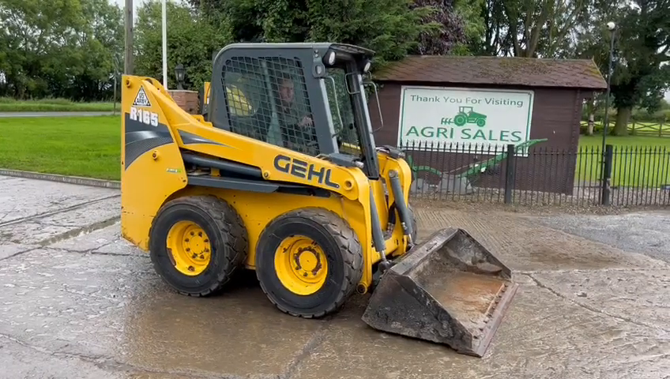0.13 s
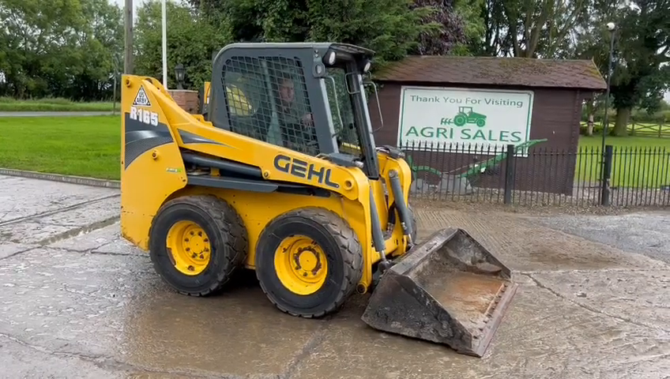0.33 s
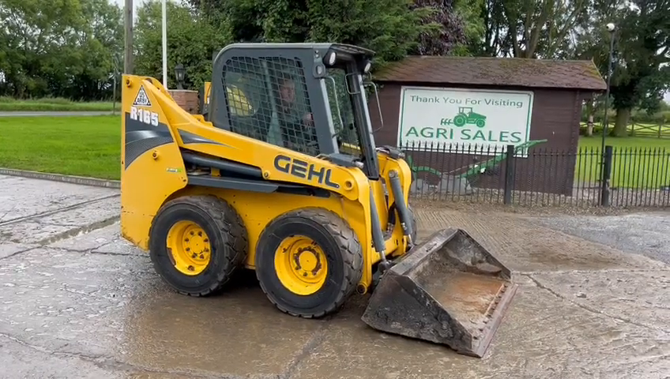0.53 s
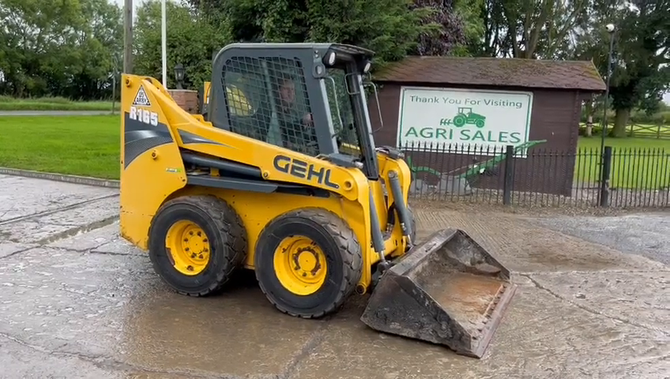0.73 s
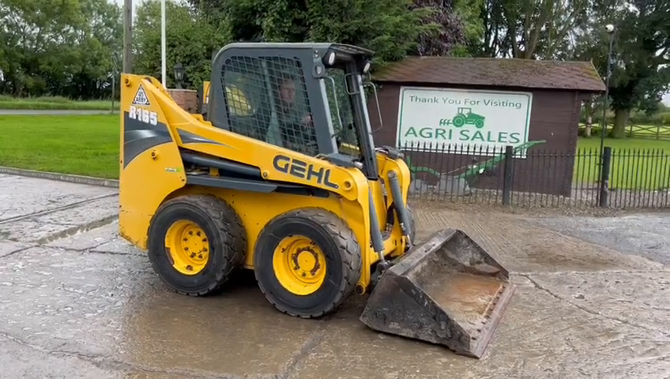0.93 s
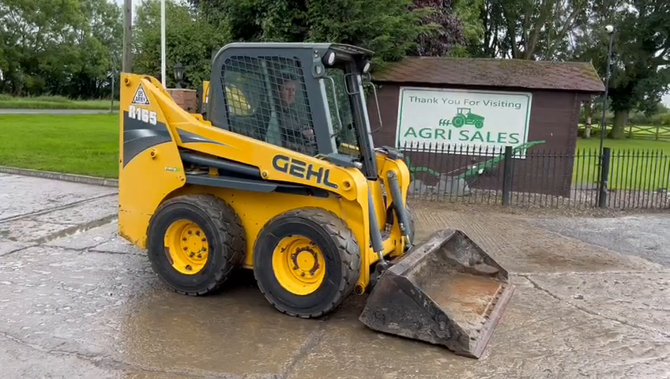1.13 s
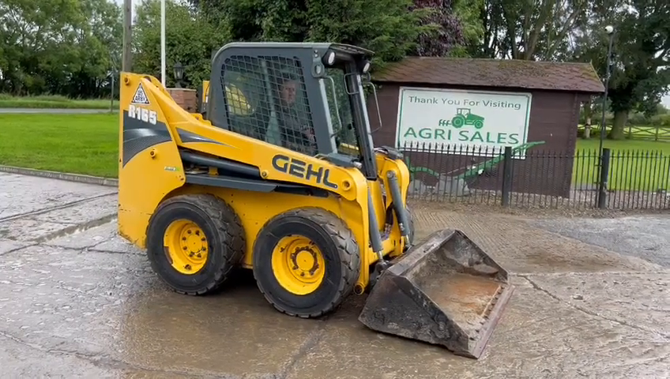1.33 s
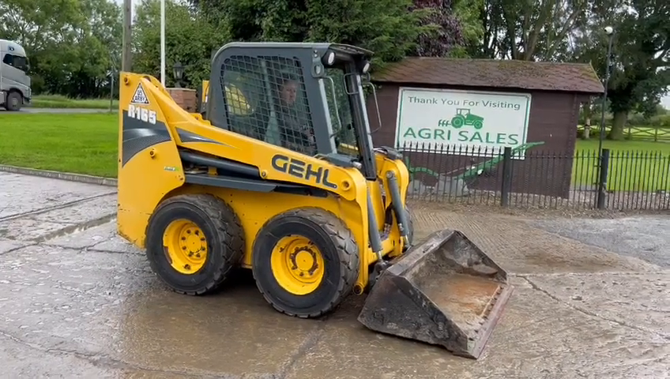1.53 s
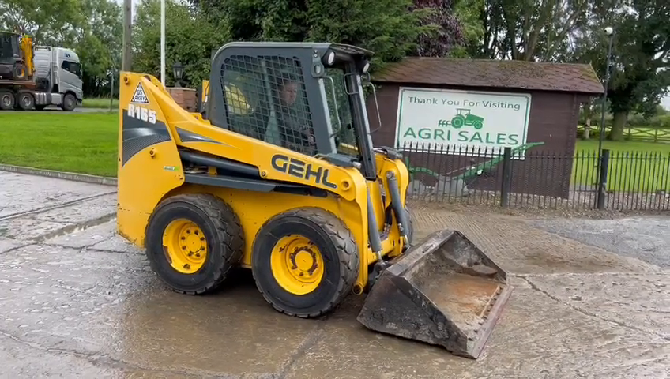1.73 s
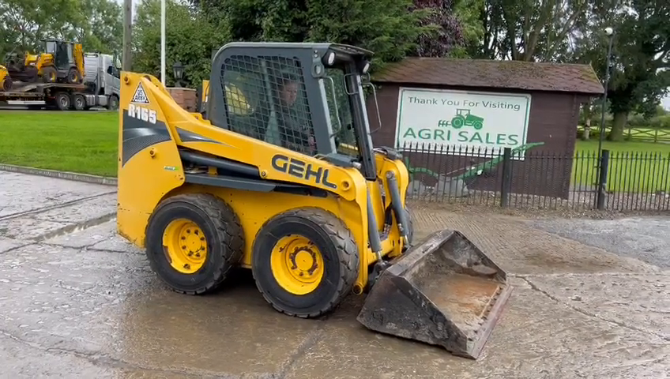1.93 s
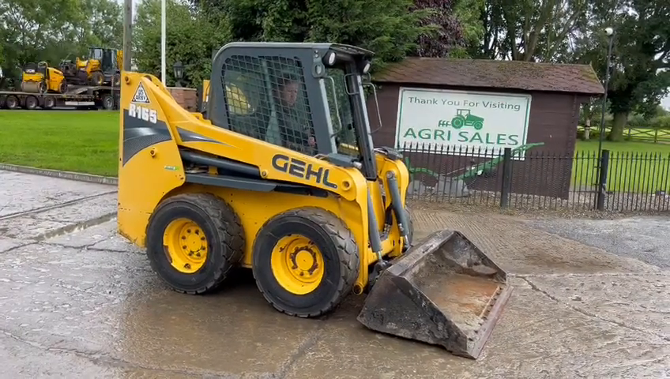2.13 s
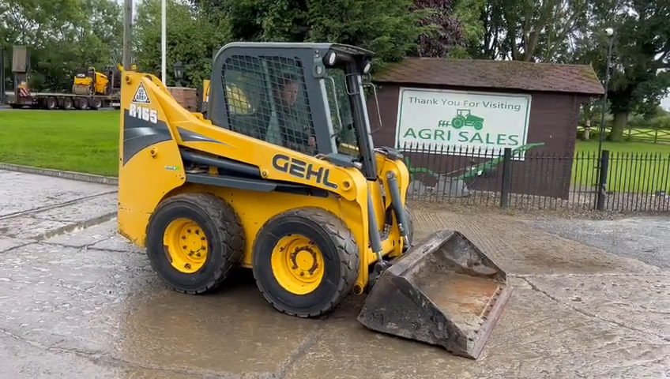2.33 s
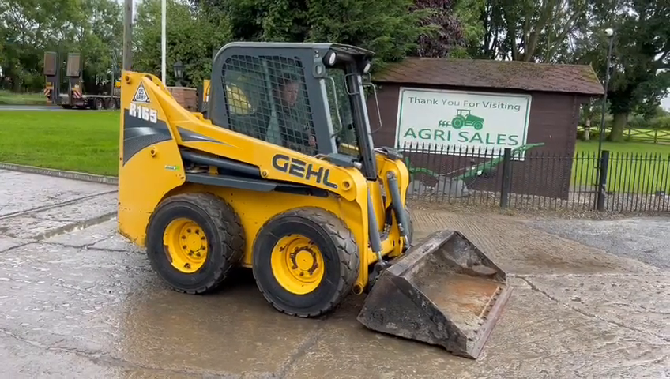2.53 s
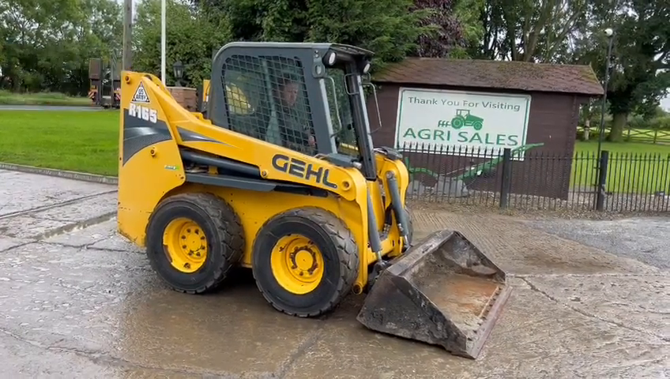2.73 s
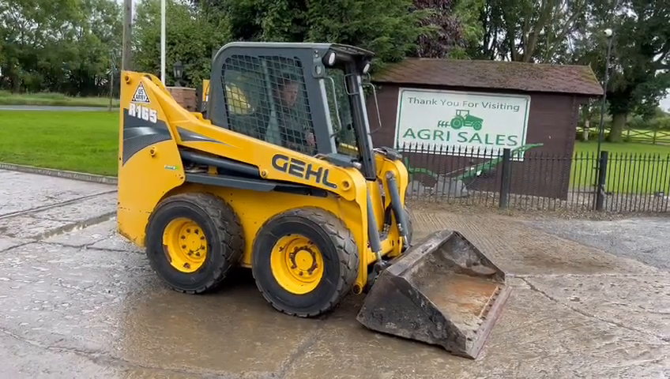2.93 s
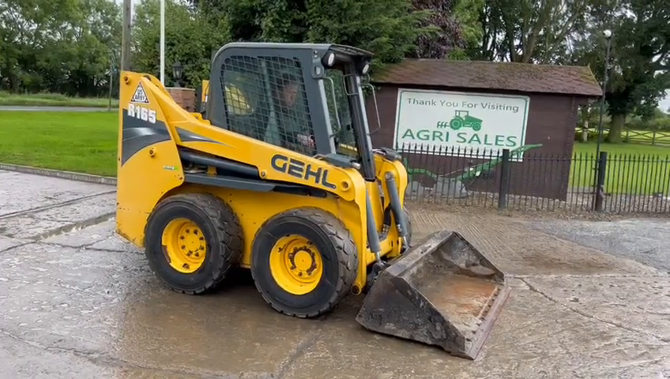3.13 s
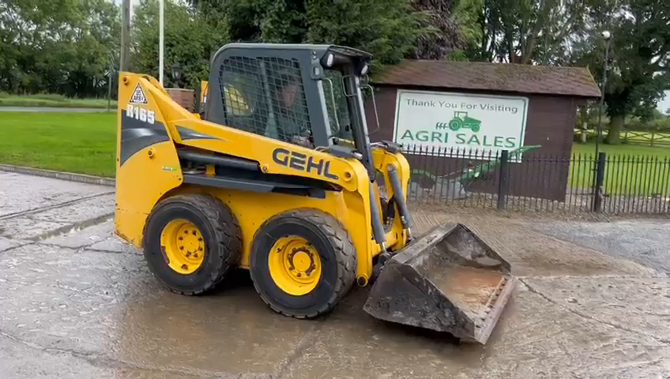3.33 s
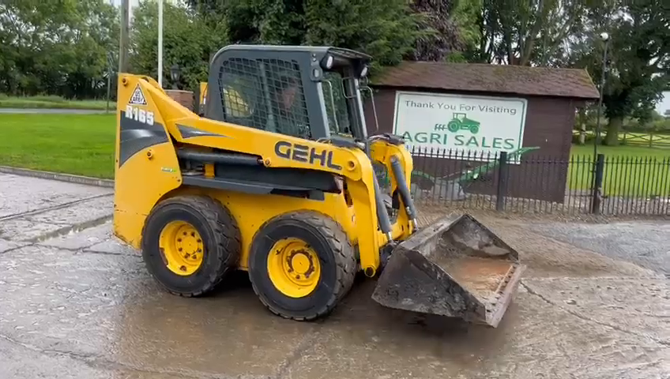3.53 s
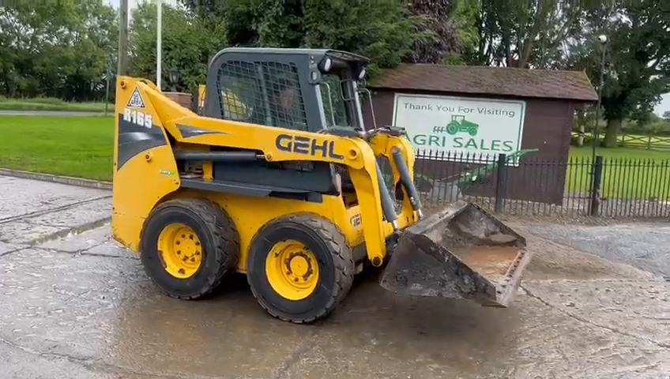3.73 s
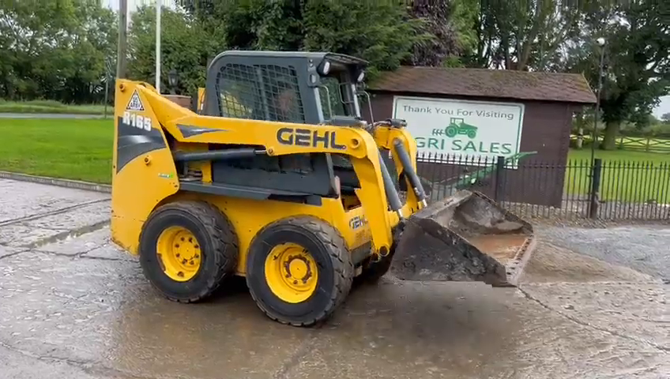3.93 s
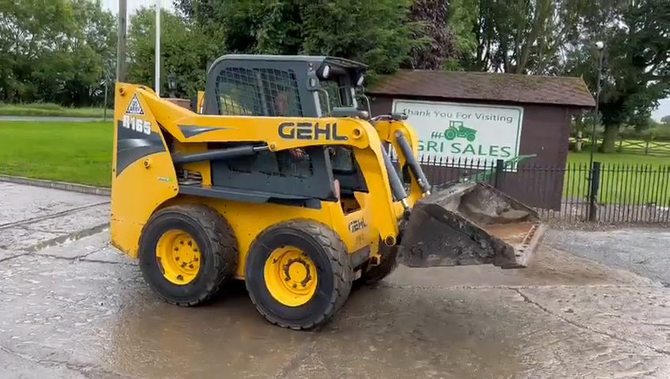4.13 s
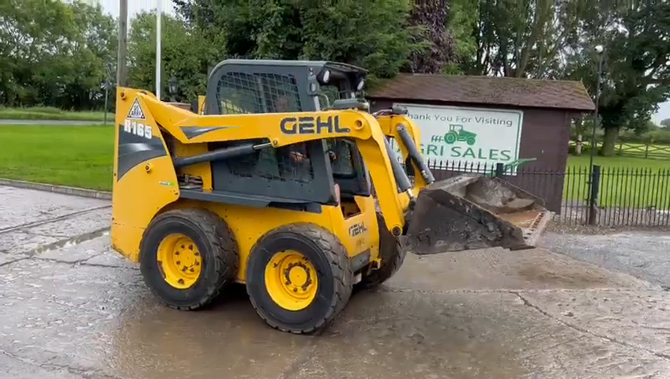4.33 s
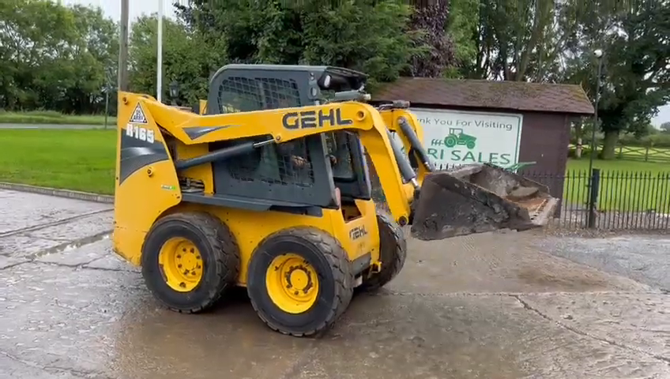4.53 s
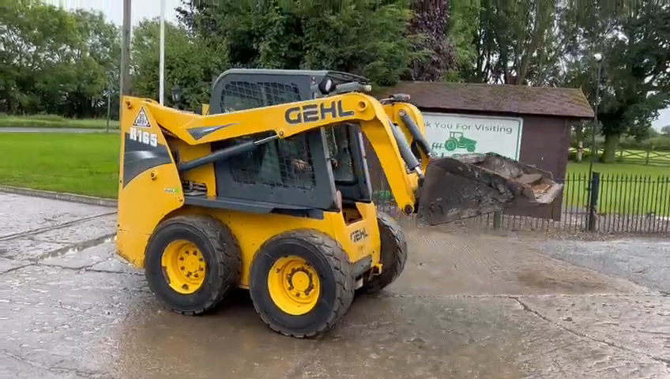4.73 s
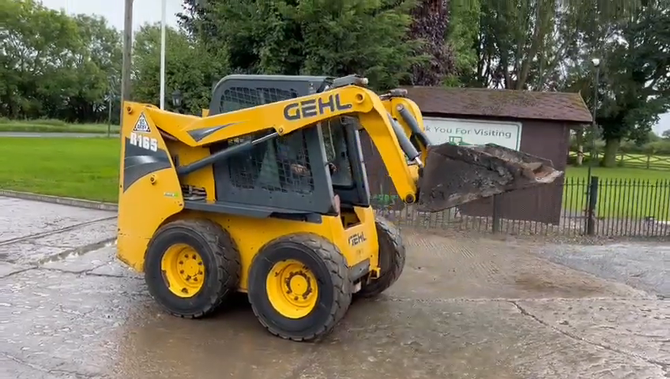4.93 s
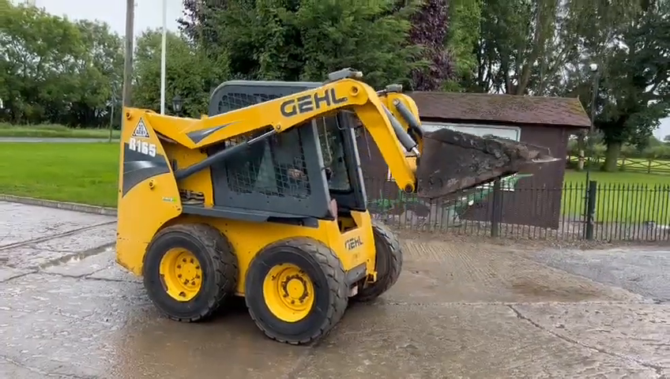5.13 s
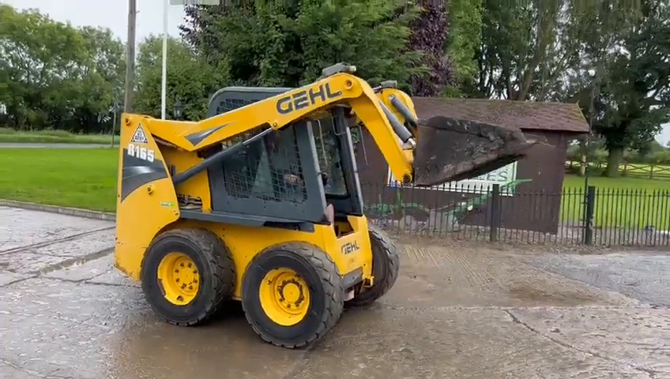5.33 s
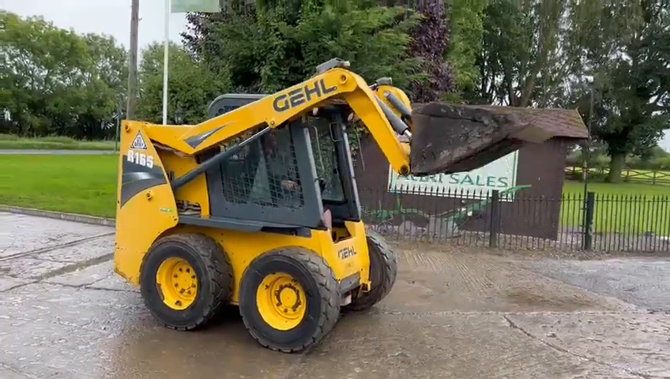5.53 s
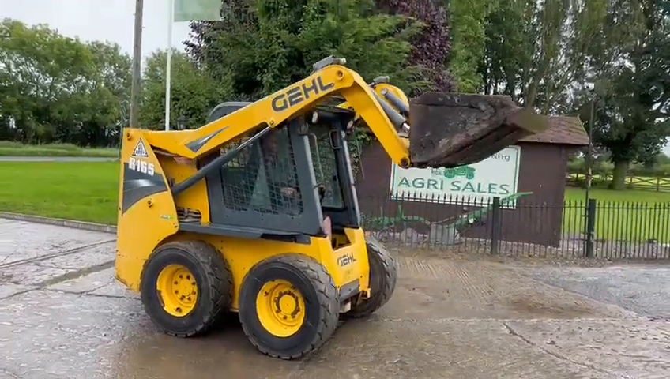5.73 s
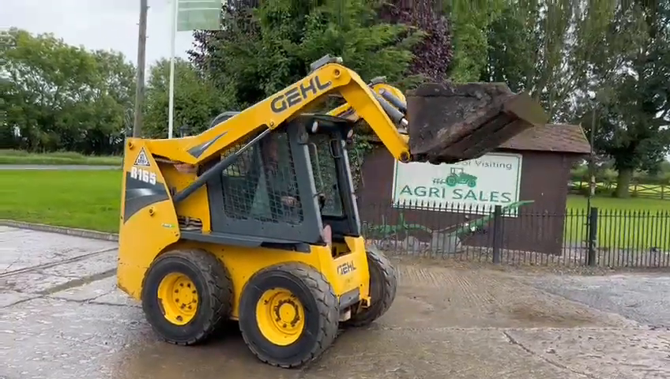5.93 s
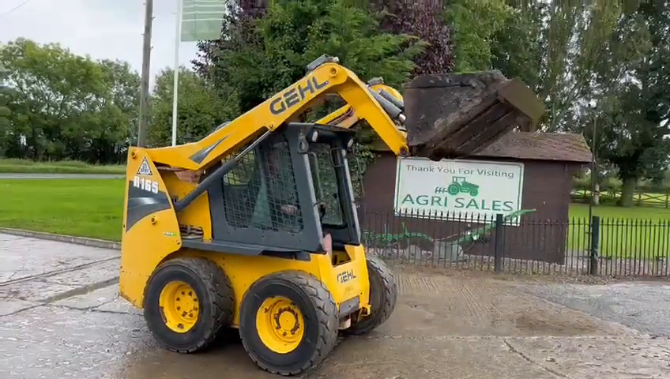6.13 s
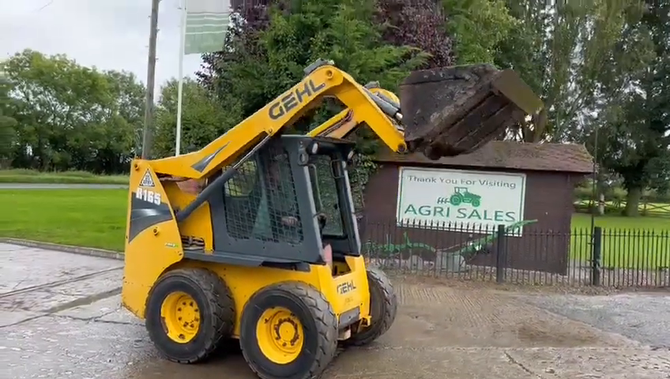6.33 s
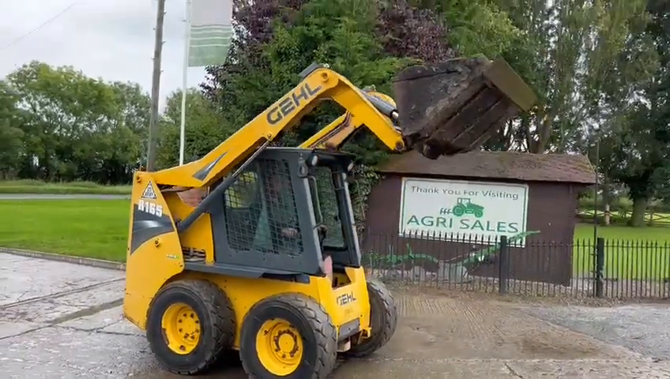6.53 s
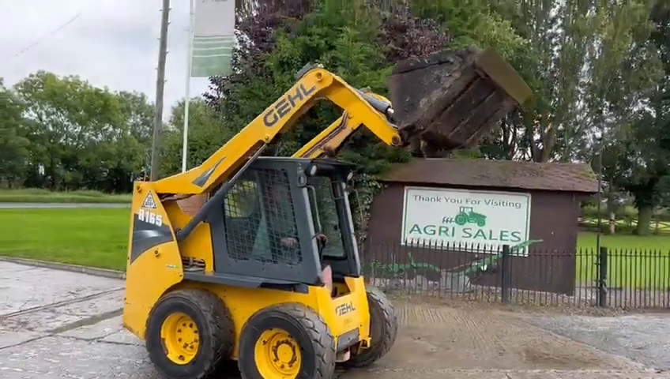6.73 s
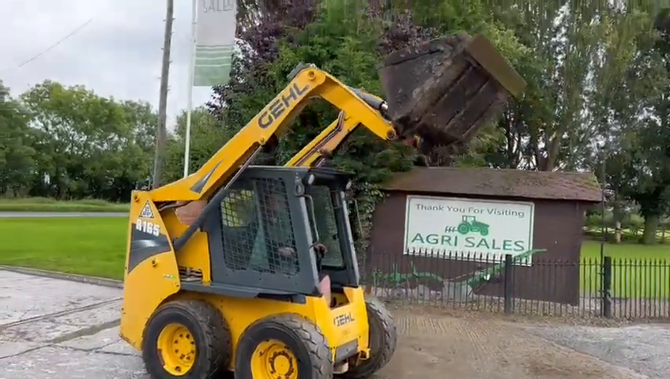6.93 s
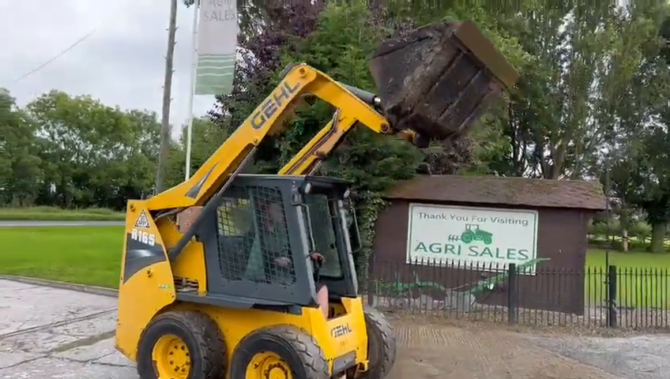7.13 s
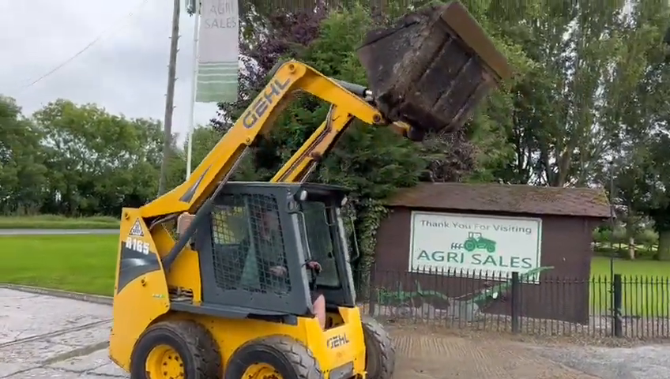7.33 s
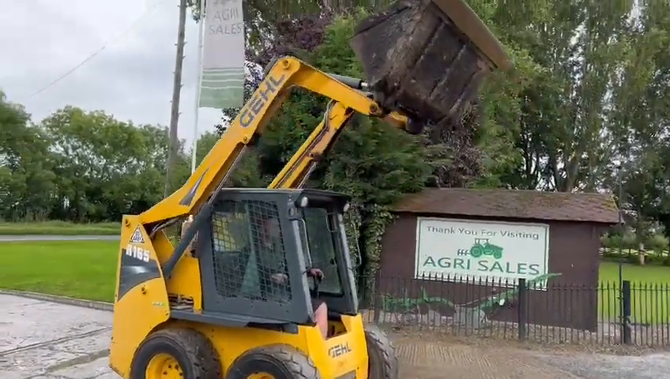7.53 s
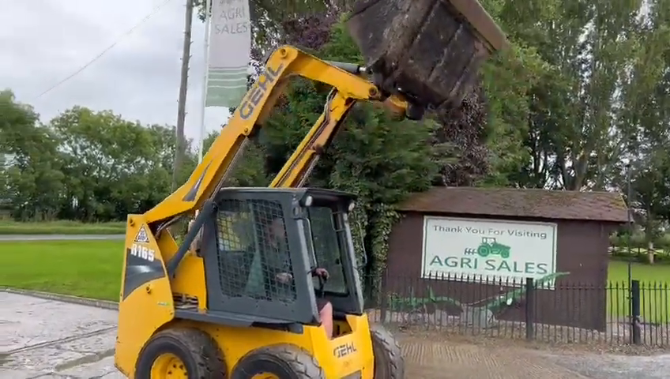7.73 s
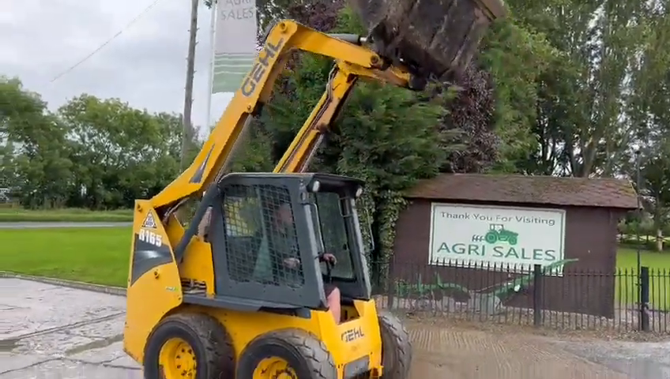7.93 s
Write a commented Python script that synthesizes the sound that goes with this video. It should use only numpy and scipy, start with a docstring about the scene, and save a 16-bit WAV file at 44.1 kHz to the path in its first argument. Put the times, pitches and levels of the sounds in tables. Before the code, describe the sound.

Close diesel engine idling on a wet yard, lorry tyres swishing past, throttle rising twice, sharp steel bucket knocks, then a steady loud whining drone.

```python
"""Skid steer in a wet yard, lorry behind

Close by, a four-cylinder diesel skid steer idles: exhaust tones, clatter, rumble and hiss follow its firings.
The throttle opens in two steps, the bucket clunks as it leaves the ground (struck steel modes),
and fan, pumps and gears whine on multiples of the firing rate while the arms rise at steady revs.
On the road behind, heard first at the left, a lorry passes: filtered noise and tread tones, then spray."""
import sys
import numpy as np
from scipy import signal
from scipy.fft import rfft, irfft
from scipy.io import wavfile
from scipy.ndimage import map_coordinates

SR = 44100
rng = np.random.default_rng(int(sys.argv[2]) if len(sys.argv) > 2 else 0)


def digitize_waveform(pressure):
    """Quantize a signal to 16-bit integers and store it at the path in sys.argv[1].

    Rows of a 2-D input are taken as channels; values are limited to [-1, 1].
    """
    field = np.atleast_2d(pressure).T
    bounded = np.clip(field, -1, 1)
    quanta = np.round(bounded * 32767).astype(np.int16)
    wavfile.write(sys.argv[1], SR, quanta)


N = 356328
TIME = np.arange(N) / SR
BINS_HZ = np.maximum(np.fft.rfftfreq(N, 1 / SR), 1)

# The throttle opens. Each row: start in seconds, new rate in firings per s, time to get there in seconds.
THROTTLE = [(1.91, 57.9, .295), (2.765, 65.27, .145)]
# Exhaust note by engine speed. Each row: rate in firings per s, firing tone in dB, its octave in dB.
NOTE_BY_SPEED = [(32.6, -54, -32.5), (37, -36, -37.5), (42.65, -21, -22.5), (47.5, -30, -39),
                 (51.5, -23, -38), (55, -16.5, -32), (57, -18.5, -46), (64, -16, -29.5)]
# Engine noise by speed. Each row: rate in firings per s, clatter in dB, rumble in dB.
NOISE_BY_SPEED = [(33.4, -43, -30.5), (56, -37, -28.5), (67.3, -33.5, -29.5)]
# Shaft-driven tones by speed. Each row: rate in firings per s, fan in dB, then in relative dB
# the lift pump, the charge pump and the gears.
WHINE_BY_SPEED = [(33.8, -31.5, -46, -28, -6), (48.7, -36, -40, -33, -9), (55.7, -32.5, -57, -0.5, -2.5),
                  (66.73, -33, -37, -0.5, -1.5)]
# Lope of the idling exhaust. Each row: multiple of the firing rate, level in relative dB.
LOPE = [(1.5, -46), (2.5, -43), (3.5, -43), (4, -42.5)]
# Strength of the four firings: one value per cylinder, in relative dB.
CYLINDER_DB = [9.5, 0.46, 21, 3.2]
# Colour of the engine block and covers. Each row: frequency in Hz, level in relative dB per Hz.
BLOCK_COLOUR = [(150, -11), (300, -1), (490, -5), (600, 1), (690, 1), (850, -13.5), (1130, -4),
                (1280, -15.5), (1650, -14.5), (1880, -11), (2270, -16.5), (2900, -15), (3700, -17),
                (6000, -46)]
# Ringing of the engine covers. Each row: frequency in Hz, width in Hz, height above the block in dB.
COVERS = [(1070, 110, 3), (1310, 62, 7), (1576, 11, 10), (1900, 200, 4), (2170, 72, 3), (2468, 55, 10.5),
          (2724, 42, 9.5), (3002, 45, 10), (3425, 76, 4.5)]
# Panel resonances that come and go: centres in Hz.
PANELS_HZ = (1350, 1600, 1850, 2100, 2350, 2600, 2900, 3250)
# Colour of the intake and exhaust rumble. Each row: frequency in Hz, level in relative dB per Hz.
RUMBLE_COLOUR = [(20, -27), (45, -5.5), (70, -5.5), (86, 1.5), (100, 2), (125, -2.5), (165, 2.5),
                 (215, -8.5), (290, -8), (400, -10), (650, -17.5), (900, -14), (2000, -35)]
# Colour of the oil and air hiss. Each row: frequency in Hz, level in relative dB per Hz.
HISS_COLOUR = [(500, -15.5), (1500, 19.5), (3000, 10.5), (4100, 1), (5500, 5), (6500, 0.5), (7200, -11.5),
               (8200, 10.5), (9000, -30.5)]
# Colour of the air leaving the fan grille. Each row: frequency in Hz, level in relative dB per Hz.
GRILLE_COLOUR = [(150, -27), (250, 3.5), (330, -3.5), (410, -5.5), (490, 1.5), (560, -17.5), (800, -34),
                 (2000, -38)]
# Lift pump tone as the arms take the load and reach out. Each row: time in seconds, level in relative dB.
LIFT_TONE = [(3.2, 5.5), (3.45, 1.5), (4.05, 3.5), (4.4, 6), (5, 11)]
# Charge pump tone at full speed. Each row: time in seconds, level in relative dB.
CHARGE_TONE = [(2.72, -43), (2.8, -39), (2.88, -34), (2.96, -44), (3.05, -33.5), (4.18, -34.5), (4.36, -45),
               (4.56, -39.5), (5.1, -44), (5.16, -38), (6.68, -35), (6.85, -37), (7.35, -38), (7.7, -33.5)]
# Mesh tones of timing gears and pump drive. Each row: multiple of the firing rate, level in relative dB,
# left minus right in dB, lead of the left in radians.
GEAR_TONES = [(7, -46.5, 1, .5), (7.5, -45.5, 3, .4), (8, -45, 2, .3), (9, -49, 0, .3),
              (10.25, -47, -1, .8), (10.5, -46, -1, .8), (11, -50.5, 1, .8), (17, -49.5, 4, 1.3),
              (17.25, -53, 4, 1.3), (17.75, -53, 5, 1.3), (18, -45, 6, 1.3), (21, -53.5, 7, 1.6),
              (21.25, -54, 9, 1.6), (24, -53, 5, 1.8), (26, -54, 1, 2), (27.5, -56, 4, 1.7),
              (28, -53, 6, 1.7), (28.25, -51.5, 7, 1.7), (29, -55, 4, 1.7), (29.25, -52.5, 5, 1.7),
              (29.5, -55, 4, 1.7), (34, -55, 0, .9), (34.5, -52, -1, .9), (34.75, -54, 0, .9),
              (35, -55, 0, .9), (35.25, -56, 0, .9), (38.5, -55, 2, .9)]
# Centres of three clusters of mesh tones: multiples of the firing rate.
CLUSTERS = (17.5, 28.5, 34.5)
# Changes in the cluster levels. Each row: time in seconds, low, middle and high cluster in dB.
CLUSTER_DB = [(3, -6, -12, 0), (3.6, -2, 5.5, 4), (4.15, -8, 3.5, 6), (4.6, 0, 3, 0.5),
              (5.1, -2.5, -3, 0.5), (5.5, 3.5, 1, 1), (6.1, -4.5, -1, -2.5), (6.75, -2, 4, 3),
              (7.3, 2.5, -2.5, -9), (8, 2, 1, 2)]
# How alike the loader is at left and right. Each row: frequency in Hz, likeness from -1 to 1.
LIKENESS = [(120, 1), (280, 0.96), (520, 0.88), (800, 0.24), (1200, 0.24), (1750, -0.49), (2600, 0.46),
            (4100, -0.18), (5600, -0.39), (6700, 0.61), (8300, -0.4)]
# Balance of the loader. Each row: frequency in Hz, left minus right in dB.
SIDE_DB = [(150, 0), (300, 1.5), (600, -1), (1000, 4.5), (1600, -0.5), (2700, -1), (4700, 6), (8000, 0)]
# Clunks of the bucket and its linkage. Each row: time in seconds, level in dB, contact softness in Hz.
CLUNKS = [(3.288, -12, 1900), (3.2938, -7.5, 2000), (3.301, -16, 1500), (3.3117, -24.5, 1300),
          (3.3265, -19, 1100), (3.347, -20, 250), (3.4083, -23.5, 400)]
# Modes of the steel bucket. Each row: frequency in Hz, level in dB, 60 dB decay time in seconds.
BUCKET_MODES = [(198, -18.5, 0.13), (220, -6.5, 0.14), (250, -10, .23), (275, -8.5, 0.21), (318, -3, 0.11),
                (338, -14.5, 0.08), (451, -8.5, 0.15), (505, -9, 0.089), (564, -11.5, 0.05),
                (730, -12.5, 0.017), (789, -12, 0.11), (903, -9.5, 0.041), (1000, -6, .034),
                (1024, -9, 0.049), (1076, -7, 0.041), (1313, -13, 0.05), (1490, -22, 0.056),
                (1646, -21, 0.069), (1900, -25, .02), (2240, -22, 0.018)]
# Dense ringing of arms and frame. Each row: band centre in Hz, level in dB, 60 dB decay time in seconds.
FRAME = [(170, -22, .25), (296, -20.5, 0.3), (460, -18, 0.12), (700, -24, 0.073)]
# Wheel groups of the lorry go by. Each row: time in seconds, tread roar, tyre rush and spray in relative dB.
WHEELS = [(0.682, -27, -38, -50), (1.299, -24.5, -29, -45), (1.749, -32, -33, -37.5),
          (2.48, -48.5, -52.5, -41)]
# Colours of tread roar, tyre rush and spray. Each row: frequency in Hz, level in relative dB per Hz.
TREAD_COLOUR = [(40, -36.5), (120, -12), (240, -5.5), (290, 1.5), (340, 2), (410, -10), (560, 2), (680, 2),
                (880, -6.5), (1100, -13.5), (2500, -44)]
TYRE_COLOUR = [(500, -25), (1150, 5.5), (1650, -5.5), (2150, -5.5), (2900, -12.5), (4000, -13),
               (8000, -45.5)]
SPRAY_COLOUR = [(1500, -21), (3000, -1.5), (4300, 1), (5500, 7), (6800, 1), (8000, -2.5), (9000, -8.5)]
# Tread blocks hitting the road, slowing in pitch as the lorry goes by. Each row: time in seconds, blocks per s.
TREAD_RATE = [(0, 360), (.9, 335), (1.25, 326), (1.6, 296), (2.2, 283)]
# Tones of the treads. Each row: multiple of the block rate, level in relative dB.
TREAD_TONES = [(1, -1.5), (1.772, 0), (2, 5), (2.499, -0.5)]
# The lorry reaches the left side first. Each row: frequency in Hz, lead in ms.
LORRY_LEAD_MS = [(300, 0.45), (1500, 0.33), (2300, 0.43), (3300, 0.467), (8000, 0.427)]
# A dull knock as the lorry comes near. Each row: time in seconds, level in dB, contact softness in Hz.
FAR_KNOCKS = [(.288, -10.5, 1400)]
# Stereo width of the recorder. Each row: frequency in Hz, side level in dB.
WIDTH = [(50, -28), (100, -8.5), (150, -12), (200, -7.5), (300, 0.5), (6000, -2.5), (8000, -4)]

IDLE_RATE = 33.35   # firings per s
OVERSHOOT_RATE, OVERSHOOT_S = .85, .06   # governor overshoot at each step: firings per s, time to its top
LIFT_S = 3.29   # the arms start up
LIFT_TAKES_S, PRESSURE_RISE_S = 3.3, 1.26   # oil pressure builds as they reach out
SAG_RATE, SAG_S = 0.615, 0.0503   # taking the weight: loss in firings per s, time to the lowest
# While the engine speeds up, exhaust and rumble swell, the fan gives way and the lift pump is buried.
SURGE_NOTE_DB, SURGE_RUMBLE_DB, SURGE_WHINE_DB, SURGE_PUMP_DB = 1.5, 2.5, -3.5, -7
LURCH_DB = 1.0   # spread of the exhaust note's unevenness while the engine pulls up
LOPE_DB, LOPE_FADE_DB = 1, -8.5   # offset at idle, and the change by twice idle speed
HISS_IDLE_DB, HISS_PRESSURE_DB = -40, 2   # hiss, and its rise at full pressure
GEARS_PRESSURE_DB, OCTAVE_PRESSURE_DB = 5, 3.5   # rise at full pressure
FAN_LIFTED_DB, RUMBLE_LIFTED_DB = -9.5, -0.44   # change with the arms fully up
FAN_STRAIN_DB, FAN_STRAIN_S = 2.5, 0.14   # the fan tone swells early in the lift; time to its top
FAN_FADES_S, FAN_FADE_TAKES_S, FAN_FADE_DB = 5.3, 0.038, -9.5   # the fan tone drops away mid-lift
SHUDDER_DB, SHUDDER_S = 2, 0.092   # the rumble swells as the arms take the weight; time to its top
STRAIN_DB, STRAIN_S = 1, 0.88   # the clatter swells early in the lift, then eases; time to its top
WAITING_S, WAITING_FADE_S, WAITING_DB = 2.87, .1, -39   # a whine until the arms start up
CLATTER_FIRING_DB, CLATTER_CYCLE_DB = 1.5, 1.7   # swell at each firing, and once every four
KNOCK_LAG = .7   # the swell follows the exhaust pulse by this share of a firing
CONTACT_SPREAD_DB = 1.5   # valves and injectors strike unequally hard
PANEL_WIDTH_HZ, PANEL_SWING_DB = 150, 1.8
PASS_S, PASS_FALLOFF = 0.38, 1.5   # half-width of each wheel pass; then amplitude falls as this power of time
HIDDEN_S, HIDING_TAKES_S, HIDDEN_SPRAY_DB = 2.54, 0.28, -6   # spray is screened off as the lorry leaves sight
CUTOFF_HZ = 8900


def loader():
    """The engine, near the microphones, with everything it drives locked to one count of firings."""
    rate, surge = governor()
    firings = np.cumsum(rate) / SR
    pressure = ramp(LIFT_S, PRESSURE_RISE_S)

    clatter_db, rumble_db = by_speed(NOISE_BY_SPEED, rate)
    clatter_db = clatter_db + STRAIN_DB * bump(LIFT_S, STRAIN_S)
    rumble_db = rumble_db + SURGE_RUMBLE_DB * surge + SHUDDER_DB * bump(LIFT_S, SHUDDER_S)
    rumble_db = rumble_db + RUMBLE_LIFTED_DB * ramp(LIFT_S, LIFT_TAKES_S)
    hiss_db = HISS_IDLE_DB + HISS_PRESSURE_DB * np.sqrt(pressure) + 0.5 * drift(21)
    fan_db, lift_db, charge_db, load_db = shaft_levels(rate, surge)

    note = from_db(surge * (SURGE_NOTE_DB + LURCH_DB * drift(40))) * exhaust(firings, rate)
    whines = fan_and_pumps(firings, fan_db, lift_db, charge_db)
    whines = whines + gears(firings, fan_db, load_db) + waiting_whine(firings)
    noises = from_db(clatter_db) * clatter(firings)
    noises = noises + from_db(rumble_db) * rumble(firings) + from_db(hiss_db) * hiss(firings)
    return note + whines + fan_rush(fan_db, load_db) + noises


def governor():
    """Firing rate, and the surge of fuel (0-1) at each throttle step; the rate sags under the arms' weight."""
    rate = IDLE_RATE - SAG_RATE * bump(LIFT_S, SAG_S)
    surge, before = 0, IDLE_RATE
    for s, new_rate, takes_s in THROTTLE:
        rate = rate + (new_rate - before) * ramp(s, takes_s)
        rate = rate + OVERSHOOT_RATE * bump(s + takes_s, OVERSHOOT_S)
        surge = surge + ramp(s, takes_s / 2) - ramp(s + takes_s, takes_s / 2)
        before = new_rate
    return rate, surge


def exhaust(firings, rate):
    """Firing tone, octave and lope, and a silencer resonance that booms when an odd order crosses it."""
    first_db, second_db = by_speed(NOTE_BY_SPEED, rate)
    second_db = second_db + OCTAVE_PRESSURE_DB * np.sqrt(ramp(LIFT_S, PRESSURE_RISE_S))
    note = from_db(first_db) * tone(firings, order=1, flutter_db=0.3)
    note = note + from_db(second_db) * tone(firings, order=2, flutter_db=2.6)

    boom_hz, width_hz = 173.5, 4
    for order, boom_db in ((3, -30.5), (5, -36)):
        resonance = from_db(boom_db) / np.hypot(1, (order * rate - boom_hz) / width_hz)
        note = note + resonance * tone(firings, order=order, flutter_db=-1.5)

    lope_db = LOPE_DB + LOPE_FADE_DB * np.minimum(rate / IDLE_RATE - 1, 1)
    for order, db in LOPE:
        level = from_db(lope_db + db + 0.9 * drift(4.7))
        note = note + level * np.sqrt(2) * np.cos(2 * np.pi * (order * firings + rng.random()))
    return note


def clatter(firings, size=2700, count=32):
    """Injectors and valves repeat a pattern of contacts every four firings, slowly turning into another."""
    loose, wobble = .45, .001   # share of fresh noise; timing spread in firings
    patterns = irfft(np.exp(2j * np.pi * rng.random((4, size // 2 + 1))), size)
    cycle = (firings + wobble * drift(27)) / 4 % 1
    played = np.array([map_coordinates(p, [cycle * size], order=3, mode="grid-wrap") for p in patterns])
    view = np.pi * TIME / 4
    repeating = rms_one(np.cos(view) * played[:2] + np.sin(view) * played[2:])
    contacts = repeating + loose * rng.standard_normal((2, N))   # combustion adds fresh noise

    hardness_db = CONTACT_SPREAD_DB * rng.standard_normal(count)
    strength_db = np.interp(cycle, np.arange(count) / count, hardness_db, period=1)
    uneven = from_db(strength_db + .6 * drift(16))
    struck = contacts * uneven * throb(firings, CLATTER_FIRING_DB, CLATTER_CYCLE_DB)
    return shifting_panels(spread(struck, BLOCK_COLOUR, COVERS))


def shifting_panels(x):
    """Each panel resonance slowly swells and fades on its own."""
    out = x
    for hz in PANELS_HZ:
        ringing = signal.lfilter(*signal.iirpeak(hz, hz / PANEL_WIDTH_HZ, fs=SR), x)
        out = out + (from_db(PANEL_SWING_DB * drift(4.9)) - 1) * ringing
    return rms_one(out)


def rumble(firings):
    """Intake and exhaust noise, partly pulsed by the firings."""
    return spread(rng.standard_normal((2, N)) * firing_gate(firings, fade=0.7, depth=0.27), RUMBLE_COLOUR)


def hiss(firings):
    """Oil and air noise that throbs with the engine."""
    return spread(rng.standard_normal((2, N)) * throb(firings, firing_db=1.0, cycle_db=1.2), HISS_COLOUR)


def firing_gate(firings, fade, depth):
    """A burst at each firing that fades towards the next; the four cylinders differ."""
    cylinder = firings.astype(int) % 4
    burst = rms_one(np.exp(-(firings % 1) / fade) * from_db(CYLINDER_DB)[cylinder])
    depth = np.clip(depth, 0, 1)
    return np.sqrt(1 - depth + depth * burst ** 2)


def throb(firings, firing_db, cycle_db):
    """A rounded swell at each firing, riding on a slower one every four firings."""
    each_firing = firing_db * np.cos(2 * np.pi * (firings - KNOCK_LAG))
    each_cycle = cycle_db * np.cos(np.pi * firings / 2)
    return rms_one(from_db(each_firing + each_cycle))


def shaft_levels(rate, surge):
    """Fan, lift pump, charge pump and gears in dB: all follow speed; the lift loads the pump and gears."""
    fan_db, lift_db, charge_db, gears_db = by_speed(WHINE_BY_SPEED, rate)
    fan_db = fan_db + SURGE_WHINE_DB * surge + FAN_LIFTED_DB * ramp(LIFT_S, LIFT_TAKES_S)
    fan_db = fan_db + FAN_FADE_DB * ramp(FAN_FADES_S, FAN_FADE_TAKES_S)
    lift_db = lift_db + SURGE_PUMP_DB * np.sqrt(np.maximum(surge, 0)) + in_time(LIFT_TONE)[0]
    charge_db = charge_db + in_time(CHARGE_TONE)[0]
    gears_db = gears_db + GEARS_PRESSURE_DB * ramp(LIFT_S, PRESSURE_RISE_S)
    return fan_db, lift_db, charge_db, gears_db


def fan_and_pumps(firings, fan_db, lift_db, charge_db):
    """Fan blades and two gear pumps, geared to the crank, sing on multiples of the firing rate."""
    fan_db = fan_db + FAN_STRAIN_DB * bump(LIFT_S, FAN_STRAIN_S)
    fan = from_db(fan_db) * tone(firings, order=6, flutter_db=2.0, lead=0.52, pan_db=2.0)
    lift = from_db(lift_db) * tone(firings, order=10, flutter_db=1.0, lead=0.85, pan_db=-1.0)
    charge = from_db(charge_db) * tone(firings, order=12, flutter_db=1.44, lead=1.42, pan_db=3.0)
    return fan + lift + charge


def gears(firings, fan_db, load_db, gears_db=-3.5, swell_db=2.0, twist=0.023):
    """Meshing teeth sing on fixed multiples; the shafts twist a little, and three clusters swell and fade."""
    grille_db = 0.47 * (fan_db + 41.0)   # the lowest tones leave through the fan grille and fade with the fan
    sides, cluster_curves = np.array([[.5], [-.5]]), in_time(CLUSTER_DB)
    out = 0
    for order, db, pan_db, lead in GEAR_TONES:
        swell = swell_db * drift(4.6)
        if order < 9:
            swell = swell + grille_db
        for centre, curve in zip(CLUSTERS, cluster_curves):
            if abs(order - centre) < 2:
                swell = swell + curve
        phase = 2 * np.pi * (order * firings + rng.random()) + twist * order * drift(10)
        out = out + from_db(db + swell) * from_db(pan_db * sides) * np.cos(phase + lead * sides)
    return np.sqrt(2) * from_db(load_db + gears_db) * out


def waiting_whine(firings):
    """The unloaded drive sings on the seventh multiple until the lift begins."""
    waiting = ramp(WAITING_S, WAITING_FADE_S) - ramp(LIFT_S - WAITING_FADE_S, WAITING_FADE_S)
    return from_db(WAITING_DB) * waiting * tone(firings, order=7, flutter_db=4.0)


def fan_rush(fan_db, load_db, rush_db=-6.0):
    """Air through the grille, as strong as the fan tone and the load allow."""
    return from_db(fan_db + load_db + rush_db) * spread(rng.standard_normal((2, N)), GRILLE_COLOUR)


def tone(firings, order, flutter_db, lead=0., pan_db=0.):
    """A multiple of the firing rate with unsteady strength; the left leads by some radians."""
    sides = np.array([[.5], [-.5]])
    strength = from_db(flutter_db * drift(29) + pan_db * sides)
    # the minus sign puts a trough at each firing when there is no lead
    return -np.sqrt(2) * np.cos(2 * np.pi * order * firings + lead * sides) * strength


def spread(pair, spectrum, peaks=()):
    """Two unrelated sounds become left and right: alike in the bass, scattered by the yard higher up."""
    db = over_hz(spectrum)
    for hz, width, top in peaks:
        db = db + top / (1 + (2 * (BINS_HZ - hz) / width) ** 2)
    alike = np.clip(over_hz(LIKENESS), -1, 1)
    mid, side = rfft(pair) * from_db(db)
    sides = np.array([[1], [-1]])
    ears = np.sqrt(1 + alike) * mid + np.sqrt(1 - alike) * side * sides
    balanced = ears * from_db(over_hz(SIDE_DB) * sides / 2)
    return rms_one(irfft(balanced, N))


def bucket(rattle_db=-36, rattle_s=0.025, frame_db=3):
    """Slack in the pins is taken up in a few blows that ring the steel bucket and shake the arms."""
    force = blows(CLUNKS, rattle_db, rattle_s)
    out = from_db(frame_db) * thud(force)
    for k, (hz, db, t60) in enumerate(BUCKET_MODES):
        r = from_db(-60 / (t60 * SR))   # decay per sample
        w = 2 * np.pi * hz / SR
        ringing = signal.lfilter([0, np.sin(w)], [1, -2 * r * np.cos(w), r * r], force + 1e-18)
        out = out + (-1) ** (k + 1) * from_db(db) * ringing
    return out * from_db([[0.9], [-0.9]])


def blows(rows, rattle_db, rattle_s):
    """Force of each blow: a softened click and a short rattle."""
    force = np.zeros((2, N))
    t = TIME[:SR // 8]
    for s, db, soft_hz in rows:
        rattle = rng.standard_normal(len(t)) + 0.29 * rng.standard_normal((2, len(t)))
        blow = (t == 0) + from_db(rattle_db) * np.exp(-t / rattle_s) * rattle
        at = int(s * SR)
        softened = signal.lfilter(*signal.butter(1, soft_hz, fs=SR), blow)
        force[:, at:at + len(t)] += from_db(db) * softened
    return force


def thud(force):
    """A heavy steel frame has too many modes to tell apart, so bands of decaying noise stand for them."""
    t, half_band = TIME[:SR // 2], 2 ** (1 / 3)
    ring = 0
    for hz, db, t60 in FRAME:
        band = signal.butter(2, [hz / half_band, hz * half_band], "band", fs=SR, output="sos")
        modes = rms_one(signal.sosfilt(band, rng.standard_normal(len(t))))
        ring = ring + from_db(db - 60 * t / t60) * modes
    return signal.fftconvolve(force, ring[None], axes=1)[:, :N]


def lorry(scatter=0.43, spray_scatter=0.71, song_db=-6, roar_db=-1.0):
    """On the road behind, tread roar comes first; spray from the wet road trails behind it."""
    tread_db, tyre_db, spray_db = passing()
    spray_db = spray_db + HIDDEN_SPRAY_DB * ramp(HIDDEN_S, HIDING_TAKES_S)
    tread = road_noise(tread_db + roar_db, TREAD_COLOUR)
    tyre = road_noise(tyre_db, TYRE_COLOUR)
    spray = road_noise(spray_db, SPRAY_COLOUR)

    slap = rms_one(from_db(1.8 * drift(130)))   # tread blocks slap the road unevenly
    song = from_db(tread_db + song_db) * tread_song()
    direct = from_the_left(slap * (tread[0] + tyre[0]) + spray[0] + song)
    diffuse = (scatter * (tread + tyre) + spray_scatter * spray)[1:]   # off trees and shed
    high_pass = signal.butter(1, 500, "high", fs=SR, output="sos")
    return (direct + signal.sosfilt(high_pass, diffuse)) * from_db([[.4], [-.8]])


def passing():
    """Tread, tyre and spray in dB: each wheel group swells and fades by one law, and their powers add."""
    power = 0
    for s, *levels_db in WHEELS:
        nearness = 1 / (1 + ((TIME - s) / PASS_S) ** 2) ** PASS_FALLOFF
        power = power + from_db(levels_db)[:, None] ** 2 * nearness
    return 10 * np.log10(power)


def road_noise(db, spectrum):
    """Three unrelated noises of one colour and level: one direct, two scattered."""
    return from_db(db + .5 * drift(12)) * colour(rng.standard_normal((3, N)), spectrum)


def tread_song():
    """Treads sing on multiples of the block rate, each tone wavering in level and phase."""
    blocks = np.cumsum(in_time(TREAD_RATE)[0]) / SR
    song = 0
    for order, db in TREAD_TONES:
        song = song + from_db(db) * (1 + drift(17)) * np.cos(2 * np.pi * order * blocks + drift(12))
    return rms_one(song)


def from_the_left(x):
    """The sound reaches the left side first: the right is delayed."""
    delay_s = over_hz(LORRY_LEAD_MS) * 1e-3
    right = irfft(rfft(x) * np.exp(-2j * np.pi * BINS_HZ * delay_s), N)
    return np.array([x, right])


def far_knock():
    """A faint, dull knock from the road: a soft blow on the same dense steel ringing."""
    return from_the_left(thud(blows(FAR_KNOCKS, rattle_db=-39, rattle_s=.01))[0])


def from_db(db):
    """Decibels to gain."""
    return 10 ** (np.asarray(db) / 20)


def rms_one(x):
    """Scale to unit power."""
    return x / np.sqrt(np.mean(x ** 2) + 1e-20)


def in_time(rows):
    """Each column of a table over time, at every sample."""
    s, *columns = np.transpose(rows)
    return [np.interp(TIME, s, c) for c in columns]


def by_speed(rows, rate):
    """Each column of a table over engine speed, at every sample."""
    speeds, *columns = np.transpose(rows)
    return [np.interp(rate, speeds, c) for c in columns]


def over_hz(points):
    """A spectrum table at every frequency bin."""
    hz, value = np.transpose(points)
    return np.interp(np.log(BINS_HZ), np.log(hz), value)


def colour(x, spectrum):
    """Give a sound a spectrum; unit power."""
    return rms_one(irfft(rfft(x) * from_db(over_hz(spectrum)), N))


def drift(rate, size=8192):
    """Slow chance with spread 1, weak above the given rate in Hz."""
    hz = np.fft.rfftfreq(size, N / SR / size)
    slow = irfft(rfft(rng.standard_normal(size)) / (1 + (hz / rate) ** 2) ** 2)
    return np.interp(np.linspace(0, size - 1, N), np.arange(size), rms_one(slow))


def ramp(start_s, takes_s):
    """From 0 to 1 in a straight line, then held."""
    return np.clip((TIME - start_s) / takes_s, 0, 1)


def bump(start_s, top_s):
    """Rises to 1 in top_s and dies away."""
    age = np.maximum(TIME - start_s, 0) / top_s
    return age * np.exp(1 - age)


def scene():
    """Loader and its bucket in front, lorry and knock on the road behind."""
    return loader() + bucket() + lorry() + far_knock()


def record(dry, top=0.88):
    """Stereo microphones: bass narrowed to the centre, highest peaks rounded, treble cut steeply."""
    mid = dry.mean(axis=0)
    narrowed = mid + irfft(rfft(dry - mid) * from_db(over_hz(WIDTH)), N)
    rounded = narrowed / (1 + (narrowed / top) ** 8) ** (1 / 8)
    treble_cut = signal.ellip(10, .2, 80, CUTOFF_HZ, fs=SR, output="sos")
    return signal.sosfilt(treble_cut, rounded)


dry = scene()
out = record(dry)
digitize_waveform(out)
```